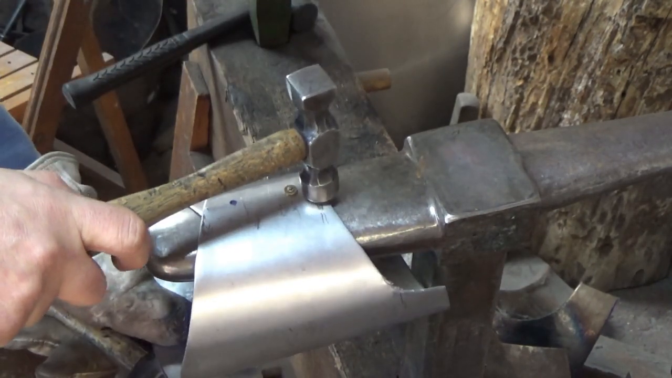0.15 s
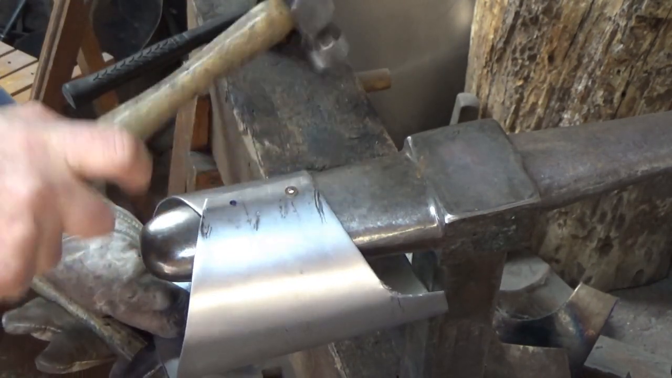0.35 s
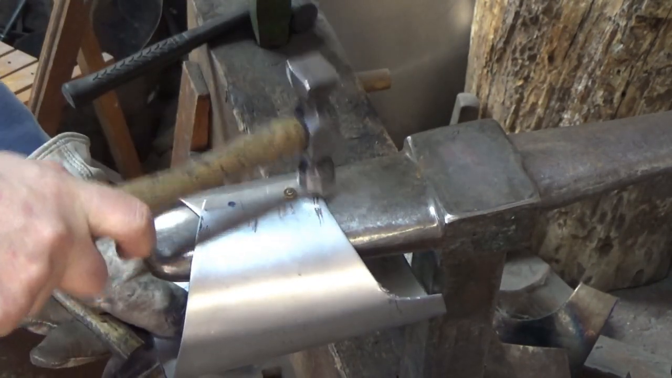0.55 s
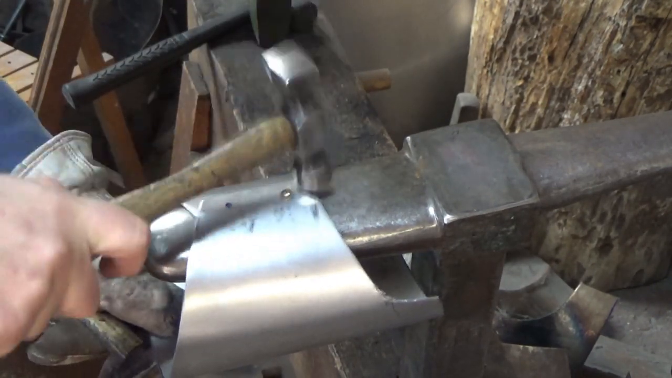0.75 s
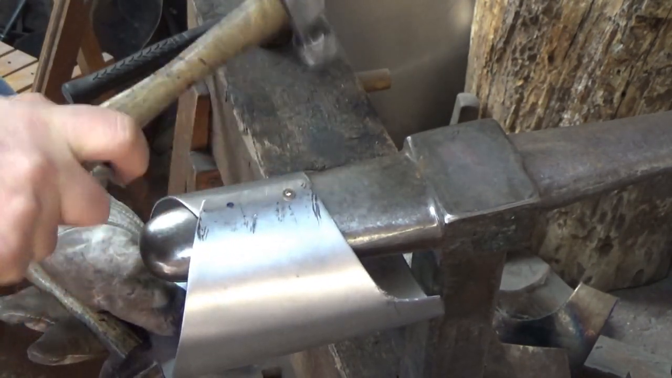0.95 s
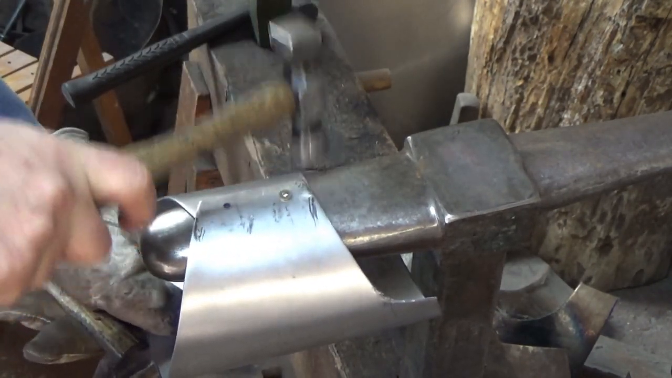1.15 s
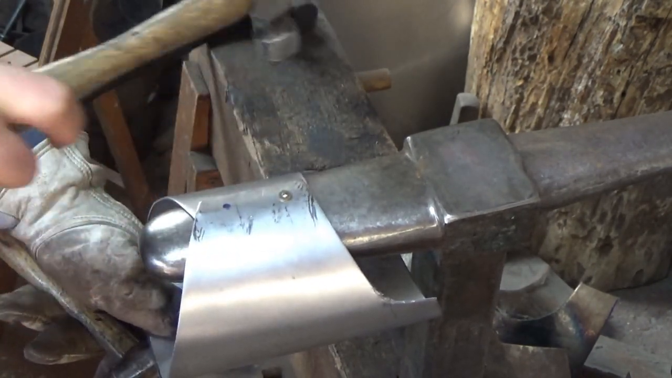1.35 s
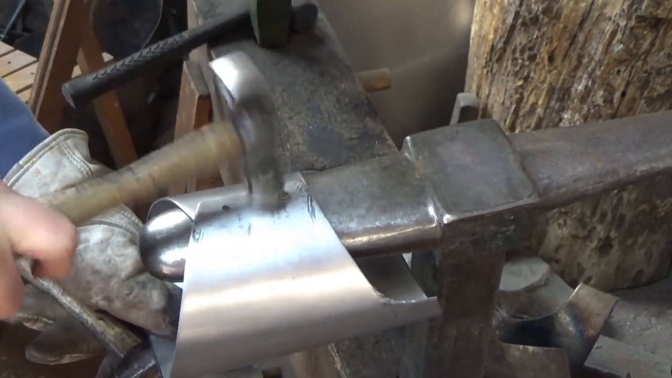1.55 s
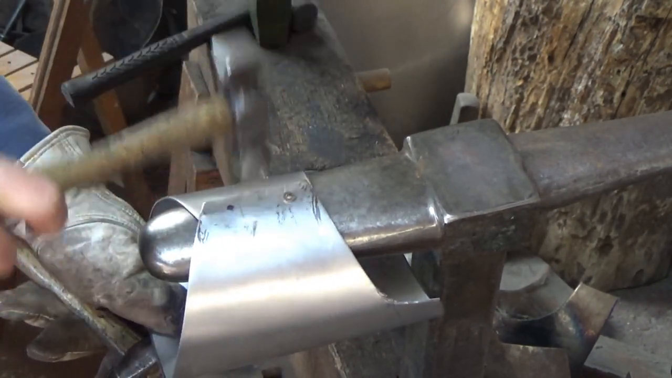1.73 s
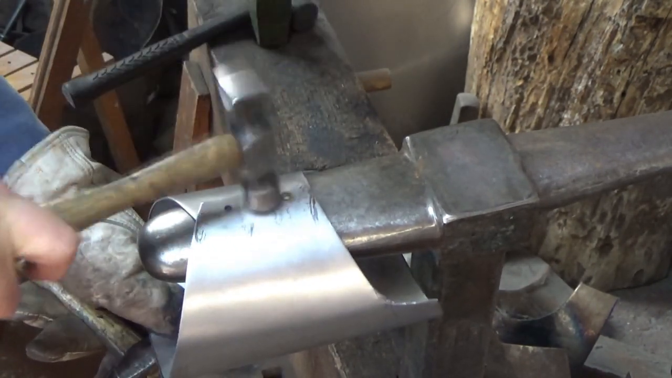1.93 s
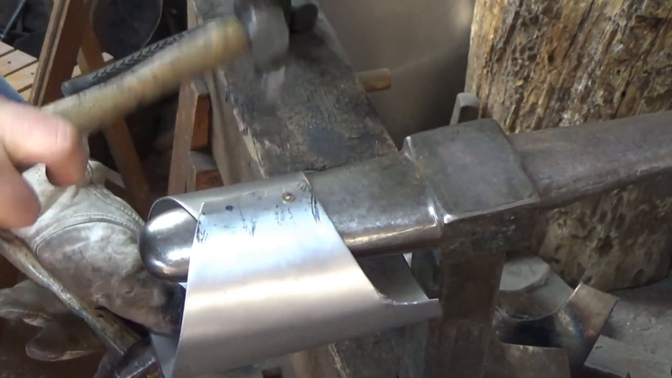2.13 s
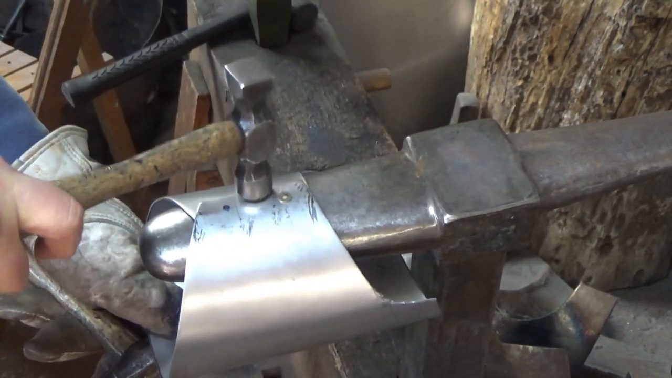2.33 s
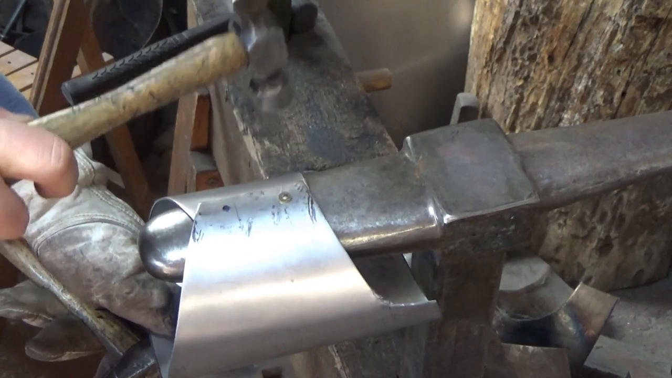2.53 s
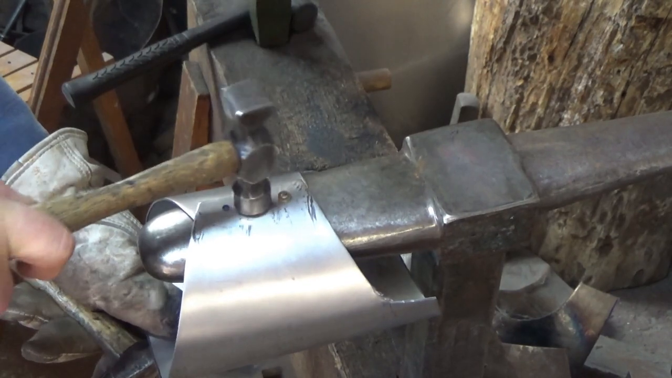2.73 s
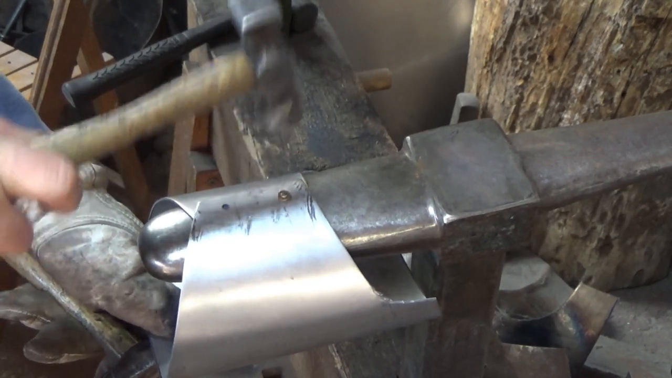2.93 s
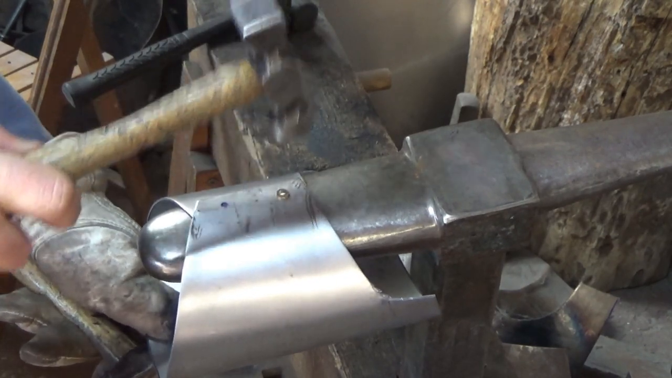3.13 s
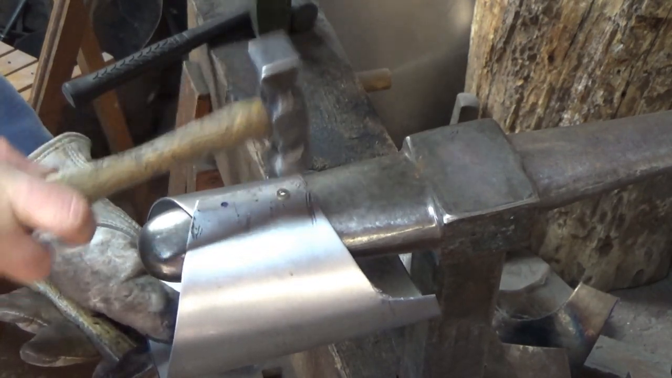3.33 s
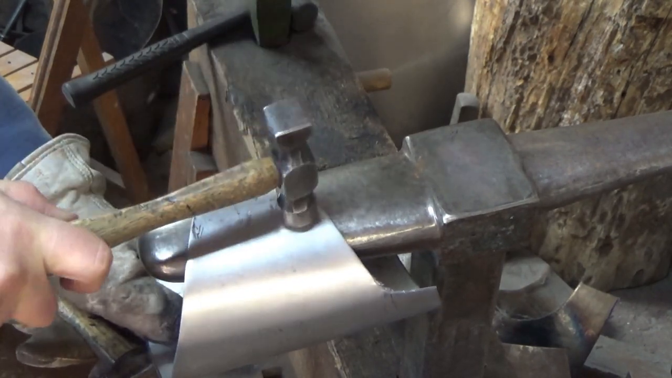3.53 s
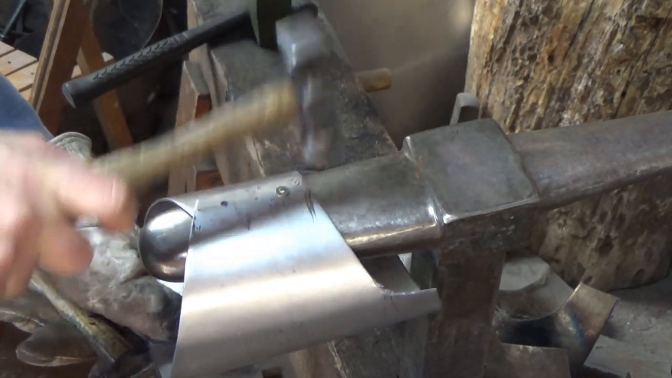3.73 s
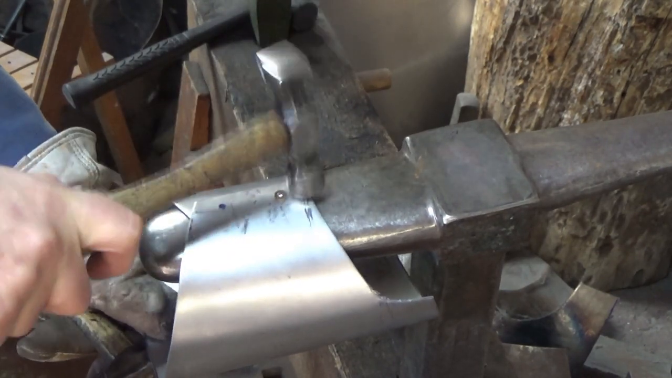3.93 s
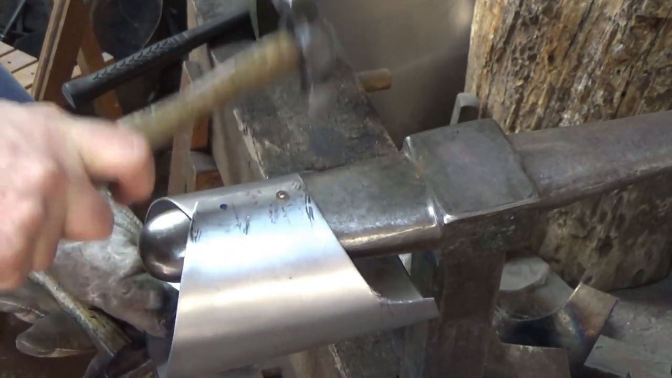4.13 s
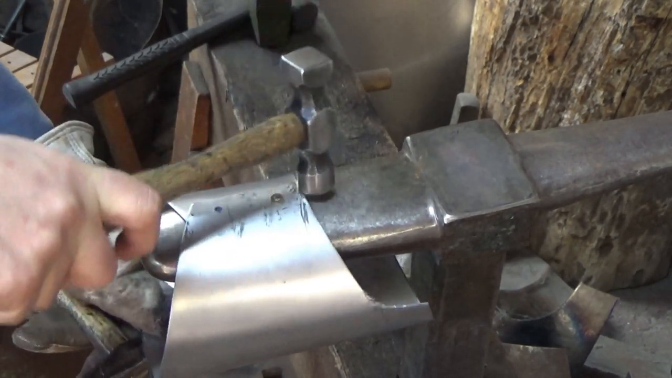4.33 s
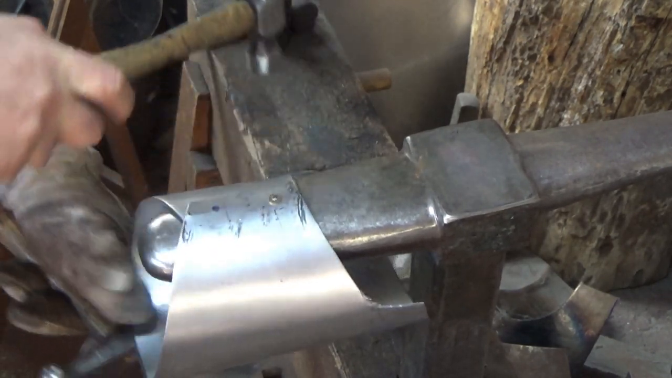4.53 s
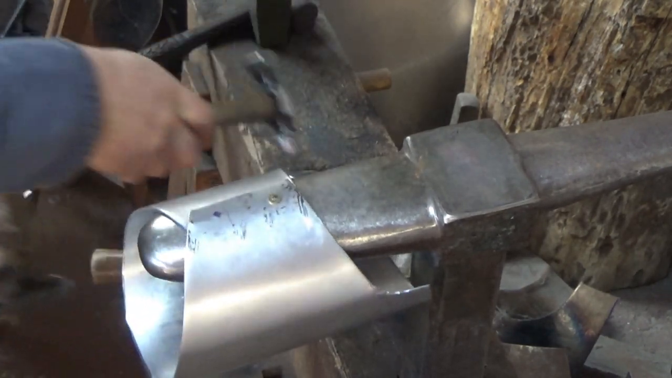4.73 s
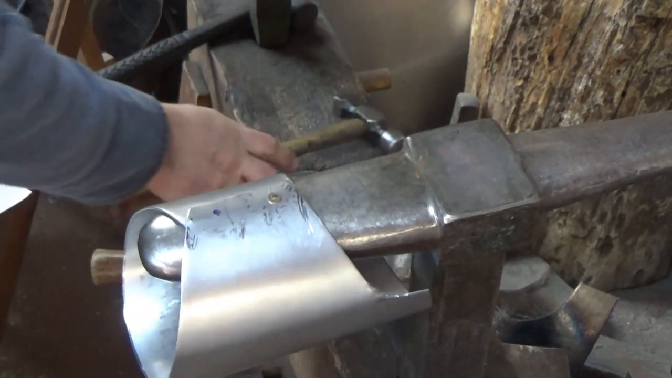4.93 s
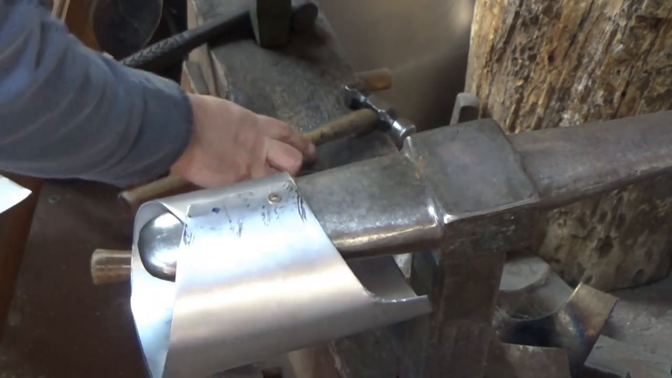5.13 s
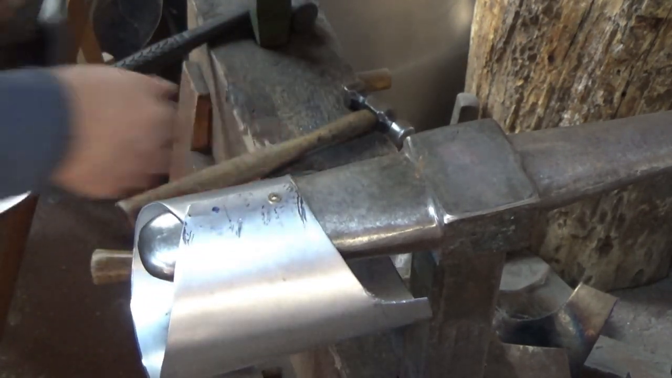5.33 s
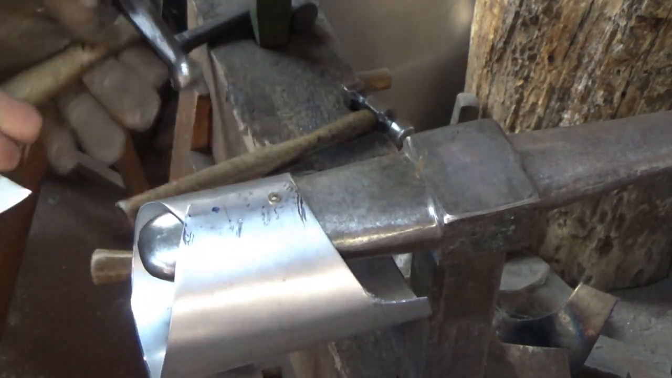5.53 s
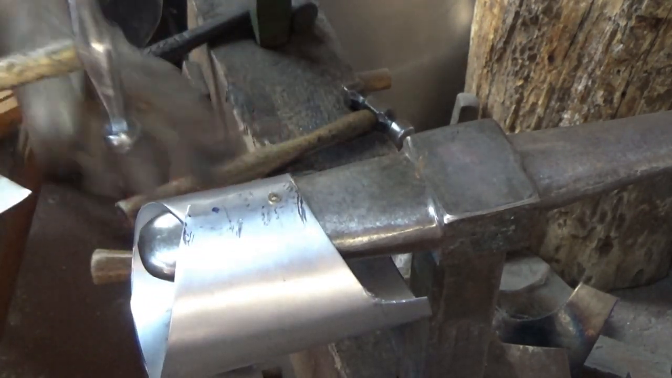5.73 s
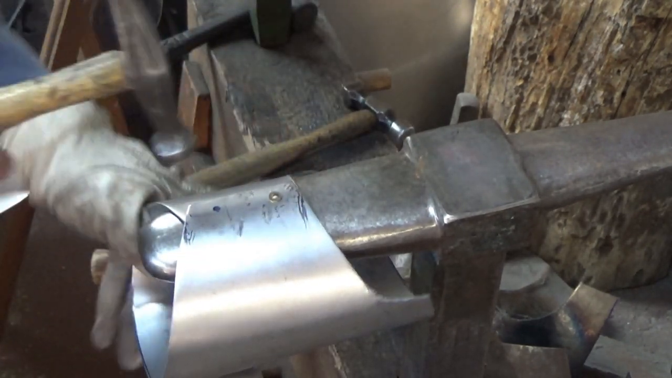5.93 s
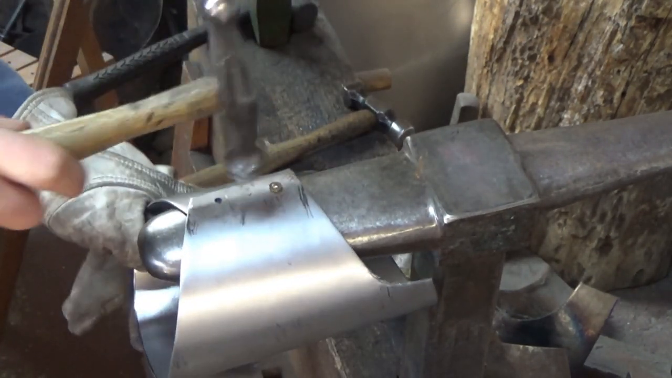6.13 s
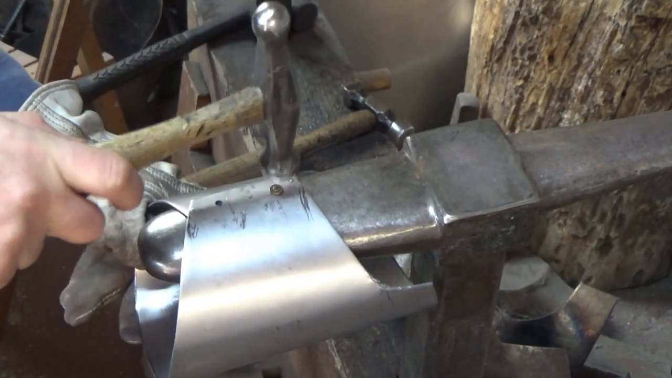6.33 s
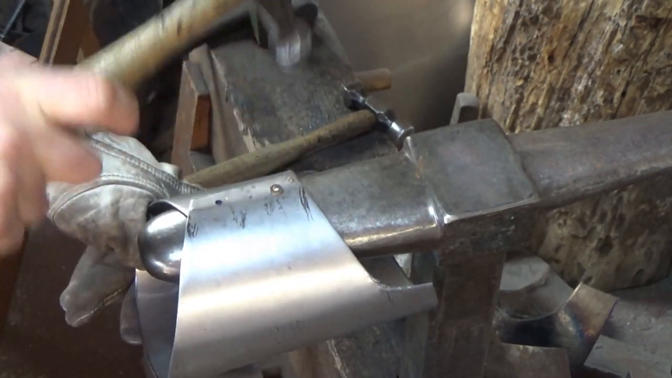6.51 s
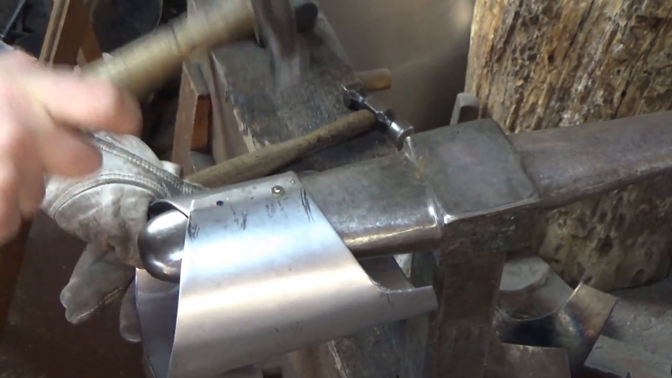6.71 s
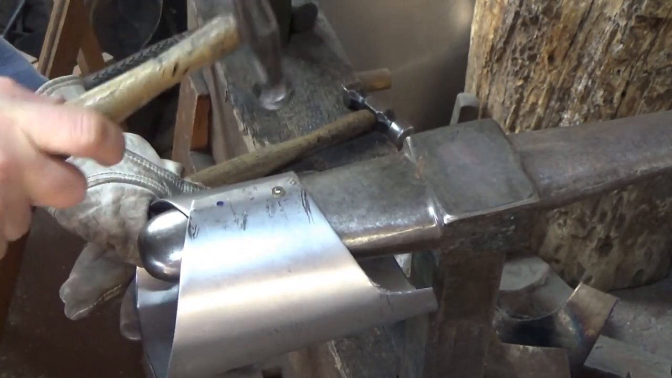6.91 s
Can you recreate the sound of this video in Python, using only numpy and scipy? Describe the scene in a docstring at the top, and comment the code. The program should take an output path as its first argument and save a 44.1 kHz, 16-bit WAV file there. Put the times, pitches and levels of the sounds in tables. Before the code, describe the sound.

A close, slightly wide pickup in a workshop with a short, dense echo; soft air and low rumble underneath. At once, a quick fading rattle of steel on steel for about 0.2 s. Then a small hammer hits curved sheet steel on an anvil horn: a strong blow at 0.46, more at 0.78, 1.07, 1.58, 1.95, 2.27 and 2.71, each a bright crash with a hollow ring near 800 Hz and glittering highs. After a gap come weaker blows at 3.54, 3.96 and 4.27. Faint sheet ticks at 4.5, then a clear high clink at 4.74, and wooden handle knocks bouncing at 4.9, 5.0 and 5.2. Faint glove rustle around 5.6; a brief scrape with metallic clicks at 6.05 to 6.17, small ticks, and a last duller, hollower blow at 6.63, ringing away. Peaks are squashed, tails swelling behind them.

```python
"""Light rattles of steel on steel, then eleven blows of a small hammer on a curved sheet on an anvil horn.
Each blow is a burst of shaped noise for the crash, plus dying sine waves for the ring of sheet and stand.
In a pause the sheet is let go, a second hammer clinks and its wooden handle drops on the block.
A gloved hand then slides the sheet back: noise driven by tiny slips. Air, rumble and cloth are soft noise.
The workshop adds an echoing tail; a limiter flattens each blow and lets the room swell up behind it."""
import sys
import numpy as np
from scipy import signal
from scipy.fft import rfft, irfft, next_fast_len
from scipy.io import wavfile
from scipy.ndimage import uniform_filter1d

SR = 44100
rng = np.random.default_rng(int(sys.argv[2]) if len(sys.argv) > 2 else 0)


def to_wav(s):
    """Save 16-bit WAV."""
    ch = np.atleast_2d(s).T  # columns
    pcm = np.round(np.clip(ch, -1, 1) * 32767)  # PCM
    wavfile.write(sys.argv[1], SR, pcm.astype(np.int16))


N = 311785
TIME = np.arange(N) / SR

# stereo width, left-right difference against the middle: pitch_hz [Hz], side_db [dB]
STEREO_WIDTH = [(60, -22), (300, -21), (700, -11), (1500, -8.5), (5000, -8), (9000, -9.5), (12000, -35.5)]
# colour of steel lightly touching or dragging on steel: pitch_hz [Hz], relative_level_db [dB per Hz]
TOUCH_COLOUR = [(100, -29), (300, -12), (560, 2), (820, 4.5), (1300, -6), (1900, -1.5), (2400, -4),
                (4200, -0.5), (6500, -0.5), (9700, -1.5), (12000, -10), (16000, -25.5)]


def amp(db):
    """Turns decibels into a plain gain."""
    return 10 ** (np.asarray(db) / 20)


def rms_one(x):
    """Scales a sound to an average strength (rms) of 1."""
    return x / np.sqrt(np.mean(x ** 2) + 1e-20)


def at_hz(points, hz):
    """Reads a table between its points, with pitch on a log axis as the ear hears it."""
    table_hz, value = np.transpose(points)
    return np.interp(np.log(hz), np.log(table_hz), value)


def gain_curve(rows):
    """Turns a table of times and levels into a gain at every sample."""
    return amp(np.interp(TIME, *np.transpose(rows)))


def swell(peak_s, db, rise_db_per_s, fall_db_per_s):
    """Gain of one stroke: it grows to its peak and fades, each at a steady rate in decibels."""
    below_peak_db = np.maximum(rise_db_per_s * (peak_s - TIME), fall_db_per_s * (TIME - peak_s))
    return amp(db - np.minimum(below_peak_db, 200))


def place(times, sounds):
    """Adds each sound to the time line at its start time."""
    out = np.zeros(N)
    for start_s, sound in zip(times, sounds):
        i = int(np.clip(start_s * SR, 0, N - 1))
        out[i:i + len(sound)] += sound[:N - i]
    return out


def without_bass(x, edge_hz):
    """Filters out the bass below edge_hz."""
    return signal.sosfilt(signal.butter(2, edge_hz, "high", fs=SR, output="sos"), x)


def coloured(spectrum, bright_db, size):
    """One row of noise with rms about 1 per entry of bright_db, the treble tilt above 1500 Hz (dB per octave)."""
    fast_size = next_fast_len(size)
    hz = np.maximum(np.fft.rfftfreq(fast_size, 1 / SR), 1)
    tilt_db = np.outer(bright_db, np.log2(np.maximum(hz, 1500) / 1500))
    gain = amp(at_hz(spectrum, hz) + tilt_db)
    gain = gain / np.sqrt(np.mean(gain ** 2, axis=1, keepdims=True))
    white = rng.standard_normal((len(gain), fast_size))
    return irfft(rfft(white) * gain, fast_size)[:, :size]


def dense_modes(spectrum, t60, bright_db, size):
    """A body's crowd of overlapping modes, as fresh noise per contact that fades by 60 dB in t60 seconds."""
    return coloured(spectrum, bright_db, size) * amp(-60 * TIME[:size] / t60)


def ringing(hz, t60, size):
    """One dying sine wave per row; neighbouring rows swing in opposite senses."""
    t = TIME[:size]
    sense = (-1) ** np.arange(len(hz))[:, None]
    fade = amp(-60 * t / np.array(t60)[:, None])
    return sense * np.sin(2 * np.pi * np.outer(hz, t)) * fade


def struck(modes, strength_db, t60_at_1k, spread_db):
    """Rings all modes per row of strength_db; high ones die sooner, and each contact varies their levels."""
    hz, db = np.transpose(modes)
    t60 = t60_at_1k * (hz / 1000) ** -.2
    scatter_db = spread_db * rng.standard_normal((len(strength_db), len(hz)))
    return amp(db + strength_db + scatter_db) @ ringing(hz, t60, size=24000)


def background():
    """Still air in stereo, a low rumble, and glove and sleeve rubbing as hands move: shaped noise."""
    # colour of the still air: pitch_hz [Hz], relative_level_db [dB per Hz]
    air_colour = [(20, 2), (80, -1), (160, -3), (350, -3.5), (800, -8), (1500, -16), (3000, -20),
                  (6000, -23), (10000, -25.5), (16000, -40)]
    # colour of rubbing cloth: pitch_hz [Hz], relative_level_db [dB per Hz]
    cloth_colour = [(200, -2), (1000, 13.5), (3000, 2.5), (6000, 0), (9500, 0.5), (13000, -7), (16000, -13)]
    # glove and sleeve rubs: peak_s [s], level_db [dB], rise_and_fall_db_per_s [dB per s]
    rub_table = [(0.41, -57, 280), (1.1, -66, 8), (5.52, -67, 50.5), (5.64, -67.5, 134), (6.9, -66.5, 7)]
    # how the rumble comes and goes: time_s [s], relative_level_db [dB]
    rumble_levels = [(0.0, -58.5), (0.23, -61.5), (1.12, -57), (3.29, -73), (4.21, -65), (4.51, -69),
                     (7.07, -67.5)]
    # colour of the rumble: pitch_hz [Hz], relative_level_db [dB per Hz]
    rumble_colour = [(30, -13), (70, -9.5), (97, -6), (150, -7.5), (220, -18.5), (500, -52)]

    side_colour = [(hz, db + at_hz(STEREO_WIDTH, hz)) for hz, db in air_colour]
    air = coloured(air_colour, [0], N)
    width = coloured(side_colour, [0], N)
    cloth = coloured(cloth_colour, [0], N)
    rumble = coloured(rumble_colour, [0], N)
    # opposite signs left and right make the air wide
    wide_air = amp(-64.5) * (air + amp(-12) * width * np.array([[1], [-1]]))
    rubbing = sum(swell(peak_s, db, rate, rate) for peak_s, db, rate in rub_table)
    return wide_air + rubbing * cloth + amp(0.5) * gain_curve(rumble_levels) * rumble


def noise_bands(size):
    """Half-octave bands of stereo noise, as (centre Hz, band); the width of each follows STEREO_WIDTH."""
    edges = np.geomspace(20, 18000, num=21)
    white = rng.standard_normal((2, 2, size + 4000))
    for k, (low, high) in enumerate(zip(edges, edges[1:])):
        band_filter = signal.butter(2, [low, high], "band", fs=SR, output="sos")
        # neighbouring bands use different noise; the filter's start-up is cut away
        mid, side = signal.sosfilt(band_filter, white[k % 2])[:, -size:]
        hz = np.sqrt(low * high)
        yield hz, mid + amp(at_hz(STEREO_WIDTH, hz)) * side * [[1], [-1]]


def workshop(x, build_s):
    """Scattered reflections as fading noise: they build up within milliseconds, and most treble dies sooner."""
    # time the tail takes to fade by 60 dB: pitch_hz [Hz], t60_s [s]
    room_fade = [(100, 0.1873), (400, 0.4449), (900, 0.3321), (2000, 0.3355), (5000, 0.2659),
                 (9000, 0.2256), (15000, 0.0004)]

    t = TIME[:SR * 3 // 4]
    tail = sum(band * amp(-60 * t / at_hz(room_fade, hz)) for hz, band in noise_bands(len(t)))
    tail = tail * (1 - np.exp(-t / build_s))
    tail = tail / np.sqrt(np.sum(tail ** 2) / 2)
    return signal.fftconvolve(x[None], tail, axes=1)[:, :N]


def slide():
    """Steel dragged over steel: a stream of tiny random slips, each feeding noise that dies in milliseconds."""
    # pushes of the sheet over the horn: peak_s [s], level_db [dB], rise_db_per_s, fall_db_per_s [dB per s]
    push_table = [(5.66, -58, 250.5, 36), (6.045, -40.5, 550.5, 450), (6.26, -58.5, 200, 500)]

    slips_per_s, slip_fade_s = 700, 0.004
    slips = (rng.random(N) < slips_per_s / SR) * rng.exponential(1, N)
    energy = signal.lfilter([1], [1, -np.exp(-1 / (slip_fade_s * SR))], slips + 1e-12)
    scrape = rms_one(np.sqrt(energy) * coloured(TOUCH_COLOUR, [-3.0], N)[0])
    return sum(swell(*push) for push in push_table) * scrape


def bounces(drops, count):
    """Turns each drop into evenly spaced, ever weaker contacts: (times, knock dB, block dB)."""
    contacts = []
    for start_s, knock_db, block_db, gap_s, loss_db in drops:
        for k in range(count):
            contacts.append((start_s + k * gap_s, knock_db - k * loss_db, block_db - k * loss_db))
    return np.transpose(contacts)


def spare_hammer():
    """The second hammer: noise clinks and sine rings of its head, then wooden knocks as the handle bounces."""
    # the head meets the anvil: start_s [s], clink_db [relative dB], lowest_mode_ring_db [relative dB]
    clink_table = [(4.57, -65.5, -45), (4.736, -22.5, -32), (4.915, -36, -31), (5.017, -47, -52),
                   (5.209, -53.5, -53.5)]
    # the handle drops: start_s [s], knock_db [dB], block_boom_db [dB before its treble is cut],
    # bounce_gap_s [s], loss_per_bounce_db [dB]
    drop_table = [(4.915, -21, -34, 0.011, 1.5), (5.017, -30, -30, 0.019, 3), (5.224, -37.5, -42, 0.053, 6)]
    # upper modes of the head: pitch_hz [Hz], relative_level_db [dB]
    head_modes = [(3044, -19), (4070, -15.5), (4260, -15), (5416, -13), (5560, -23), (7391, -20.5),
                  (7773, -28)]
    # colour of the clink: pitch_hz [Hz], relative_level_db [dB per Hz]
    clink_colour = [(60, -30.5), (300, -19), (800, 2.5), (1400, -11), (3200, -5.5), (4300, -4),
                    (7500, -3.5), (10000, -6), (15000, -33.5)]
    # colour of the wood: pitch_hz [Hz], relative_level_db [dB per Hz]
    wood_colour = [(30, -38), (80, -35), (130, -18.5), (200, -11), (400, 2.5), (700, 0.5), (1100, -7.5),
                   (1700, -19.5), (4000, -26), (12000, -55.5)]

    start_s, clink_db, ring_db = np.transpose(clink_table)
    knock_s, knock_db, block_db = bounces(drop_table, count=3)
    clink = amp(clink_db - 3.5)[:, None] * dense_modes(clink_colour, 0.128, np.zeros(len(start_s)), size=8000)
    plain = np.zeros(len(knock_s))
    knock = place(knock_s, amp(knock_db)[:, None] * dense_modes(wood_colour, 0.095, plain, size=8000))
    block = place(knock_s, amp(block_db)[:, None] * dense_modes(wood_colour, 0.4, plain, size=22000))
    # only the low boom of the block is kept
    block = signal.sosfilt(signal.butter(1, 170, fs=SR, output="sos"), block)
    upper = place(start_s, struck(head_modes, clink_db[:, None], t60_at_1k=0.28, spread_db=2.0))

    # every contact feeds more energy into the lowest mode
    lowest_hz, lowest_t60_s = 2904, 0.4
    fade = amp(-60 * TIME[:40000] / lowest_t60_s)
    energy = place(start_s, np.outer(amp(ring_db - 6.0), fade) ** 2)
    lowest = np.sqrt(energy) * np.sin(2 * np.pi * lowest_hz * TIME)
    return place(start_s, clink) + knock + block, upper + lowest


def touches():
    """Light contacts of hammer, sheet and horn: a short noise crash, a shimmer, and the loose sheet's ring."""
    # sheet rattling and touching on the horn: start_s [s], level_db [dB],
    # ring_db [dB against that level], flex_db [dB against that level]
    touch_table = [(0.002, -16, 3.5, -25), (0.013, -12.5, -2, -25), (0.022, -16, -7.5, -25),
                   (0.060, -21, -5, -25), (0.098, -22.5, -8.5, -25), (0.122, -23.5, -9, -25),
                   (0.138, -27, -6, -25), (0.183, -36, -10.5, -20), (0.426, -42.5, -6, -25),
                   (3.035, -57, -5, -15), (3.397, -61, -2, -20), (4.475, -45, 2, -8), (4.557, -46, 0.5, -1),
                   (4.571, -44, -3.5, -1), (5.673, -55, 4, -15), (5.975, -54, 4, -15),
                   (6.052, -30.5, 2, -6), (6.070, -34.5, 2.5, -5), (6.152, -35, -2, -8),
                   (6.167, -26.5, -3, -8), (6.341, -50, -9, -8), (6.475, -50, -6, -7),
                   (6.553, -59, -4, -10)]
    # modes of the sheet lying loose on the horn: pitch_hz [Hz], relative_level_db [dB]
    loose_modes = [(578, -17), (842, -16), (954, -18), (1890, -17.5), (2430, -22), (3113, -16.5),
                   (3990, -15), (4256, -16), (4308, -17), (5746, -17.5), (6150, -18), (6905, -22.5),
                   (8590, -15.5), (9690, -17)]
    # cluster of bending modes of the loose sheet: pitch_hz [Hz], relative_level_db [dB per Hz]
    bending_colour = [(500, -45), (720, -14), (810, 0), (870, -1), (980, -12), (1300, -50), (16000, -90)]

    start_s, db, ring_db, flex_db = np.transpose(touch_table)
    level = amp(db)[:, None]
    # a firmer touch is brighter: tilt in dB per octave for each dB above a plain touch
    plain_touch_db, tilt_per_db = -26, 0.2195
    bright_db = tilt_per_db * (db - plain_touch_db)
    tick = dense_modes(TOUCH_COLOUR, .075, bright_db, size=6000)
    shimmer = amp(-25) * dense_modes(TOUCH_COLOUR, 0.48, bright_db, size=22000)
    # the ring follows half of that tilt, around 4000 Hz
    tilt_db = np.outer(bright_db, np.log2(np.array(loose_modes)[:, 0] / 4000) / 2)
    ring = struck(loose_modes, tilt_db + ring_db[:, None], t60_at_1k=0.2, spread_db=2.5)
    flex = amp(flex_db)[:, None] * dense_modes(bending_colour, 0.19, np.zeros(len(start_s)), size=14000)
    return sum(place(start_s, level * part) for part in (tick, shimmer, ring, flex))


def blows():
    """Hammer blows: a noise crash of crowded modes, and the lasting sine ring of sheet, horn and stand."""
    # hammer blows: start_s [s], force_db [relative dB], brightness_db [dB per octave],
    # flex_db [relative dB], bend_pitch_hz (the sheet's main bending mode) [Hz], stand_thud_db [relative dB]
    blow_table = [(0.4604, 5, -0.05, -7, 805.5, -5), (0.7766, 0, 0.37, -3.5, 807.8, -19.5),
                  (1.0682, -1.5, 0.0446, -2.5, 806, -16.5), (1.5816, 1.5, 0.18, -3.5, 855.7, -1),
                  (1.954, 1, 0.54, -5.5, 882.5, -6), (2.266, -1.5, 0.0, -7, 835, -1),
                  (2.7072, 0, 1.31, -6, 868.5, 3), (3.5431, -3.5, 0.84, -7.5, 864.6, 0.5),
                  (3.9588, -6, -0.5, -5.5, 875.4, -16), (4.272, -8, 0.1257, -0.16, 853, -17),
                  (6.6255, -7.5, -1, -0.5, 959.5, -30)]
    # colour of the struck sheet: pitch_hz [Hz], relative_level_db [dB per Hz]
    sheet_colour = [(30, -44), (100, -31), (230, -17), (400, -1), (680, -2), (830, 8.5), (1080, -5),
                    (2300, -6.5), (3200, 0.5), (6000, 2), (9000, 4.5), (11000, 1), (13000, -10),
                    (16000, -21.5)]
    # strong modes of the sheet pressed on the horn: pitch_hz [Hz], relative_level_db [dB]
    sheet_modes = [(406, -34), (475, -37), (578, -26), (765, -35.5), (806, -26), (950, -33.5),
                   (1880, -36.5), (2428, -31), (3110, -33.5), (3170, -30.5), (3500, -37), (3992, -29),
                   (4305, -33), (4382, -29.5), (4466, -29), (4716, -29), (5423, -30.5), (5801, -27),
                   (6043, -26.5), (6634, -28), (7745, -29), (8687, -24), (8844, -25), (9429, -27.5)]
    # modes of the anvil and its stand: pitch_hz [Hz], relative_level_db [dB], t60_s [s]
    stand_modes = [(89, -66, 0.42), (149.6, -58.5, .7), (175.2, -57.5, 0.89), (308.9, -46.5, .45)]

    start_s, force_db, bright_db, flex_db, bend_hz, thud_db = np.transpose(blow_table)
    force = amp(force_db)[:, None]
    crack = dense_modes(sheet_colour, 0.05055, bright_db, size=8000)
    shimmer = amp(-4.5) * dense_modes(sheet_colour, 0.2428, bright_db, size=22000)

    # a sheet that lies loosely flexes more and gives more body
    body_filter = signal.butter(1, [260, 1300], "band", fs=SR, output="sos")
    body_change = amp(flex_db)[:, None] - 1
    crack = force * (crack + body_change * signal.sosfilt(body_filter, crack))
    shimmer = force * (shimmer + body_change * signal.sosfilt(body_filter, shimmer))

    # flex acts only on the low modes of the ring
    is_low = np.array(sheet_modes)[:, 0] < 1300
    ring = struck(sheet_modes, np.outer(flex_db, is_low), t60_at_1k=.33, spread_db=2.0)
    bend_t60 = np.full(len(start_s), .4)
    bend = amp(flex_db - 20)[:, None] * ringing(bend_hz, bend_t60, size=24000)

    stand_hz, stand_db, stand_t60 = np.transpose(stand_modes)
    scatter_db = rng.normal(0, 1.4, (len(start_s), len(stand_hz)))
    stand = amp(stand_db + scatter_db) @ ringing(stand_hz, stand_t60, size=44000)
    thud = amp(thud_db - 32)[:, None] * ringing([58], [.06], size=6000)

    sheet_ring = without_bass(place(start_s, force * (ring + bend)), edge_hz=150)
    lasting = sheet_ring + place(start_s, force * stand) + place(start_s, thud)
    return without_bass(place(start_s, crack), edge_hz=90), place(start_s, shimmer), lasting


def scene():
    """All anvil sounds come from straight ahead and spread into the room, over the soft background."""
    crack, shimmer, ring = blows()
    knocks, head = spare_hammer()
    small = without_bass(touches() + knocks + slide(), edge_hz=80)
    to_room = amp(4.0) * crack + amp(-8.5) * shimmer + amp(-8) * small + amp(-16.5) * (ring + head)
    direct = amp(-1.0) * crack + amp(2) * shimmer + small + amp(3.5) * ring + head
    return direct + workshop(to_room, build_s=0.0046) + background()


def limiter(x, threshold_db, slope, release_db_per_s, attack_s):
    """Turns loud sound down, smoothed over the attack time, and lets it come back at a steady rate."""
    power = uniform_filter1d(np.mean(x ** 2, axis=0), size=130)  # averaged over about 3 ms
    over_db = np.maximum(10 * np.log10(np.maximum(power, 1e-12)) - threshold_db, 0)
    # hold each peak and let it sink steadily
    sinking_db = release_db_per_s * TIME
    held_db = np.maximum.accumulate(over_db + sinking_db) - sinking_db
    r = np.exp(-1 / (attack_s * SR))
    smooth_db = signal.lfilter([1 - r], [1, -r], held_db)
    return x * amp(-slope * smooth_db)


def record(dry):
    """Gain control, a fast limiter for the first milliseconds of a blow, rounded peaks, bass and top cut."""
    held = limiter(dry, threshold_db=-15.0, slope=0.8936, release_db_per_s=229.5, attack_s=0.0046)
    held = limiter(held, threshold_db=-11.5, slope=1, release_db_per_s=1500, attack_s=.0002)
    rounded = .72 * np.tanh(held / .72)
    no_bass = signal.sosfilt(signal.butter(1, 40, "high", fs=SR, output="sos"), rounded)
    # steep cut above 16 kHz
    return signal.sosfilt(signal.ellip(10, .1, 70, 16000, fs=SR, output="sos"), no_bass)


dry = scene()
out = record(dry)
to_wav(out)
```